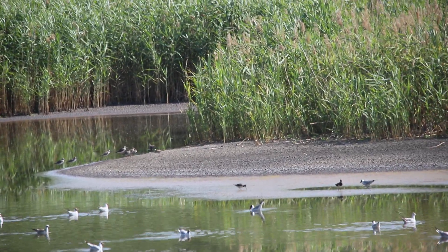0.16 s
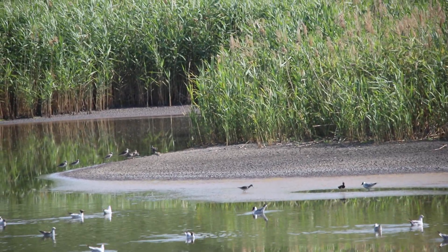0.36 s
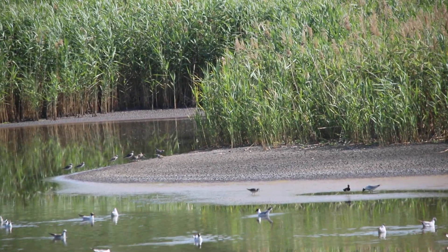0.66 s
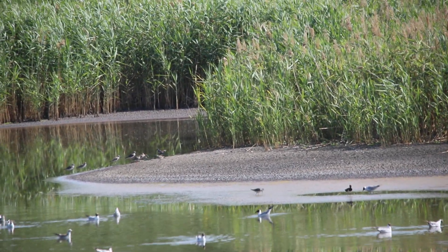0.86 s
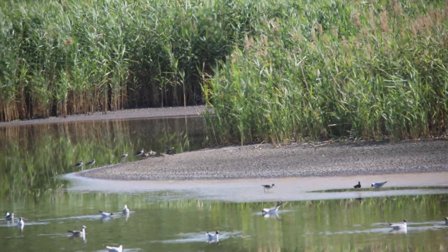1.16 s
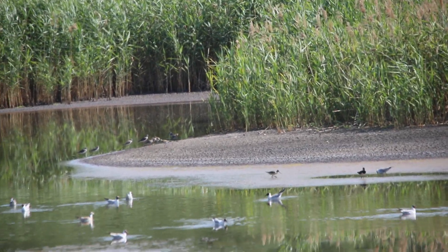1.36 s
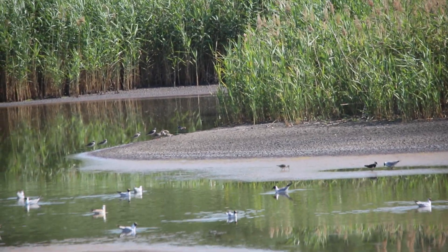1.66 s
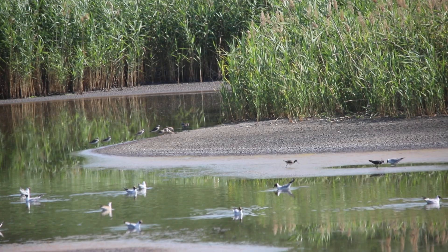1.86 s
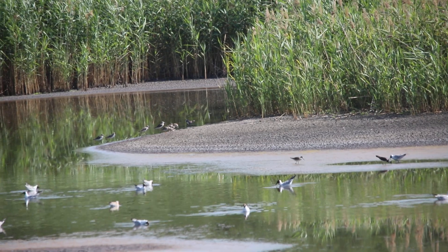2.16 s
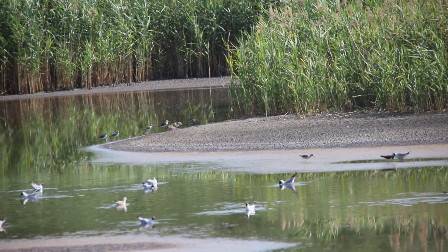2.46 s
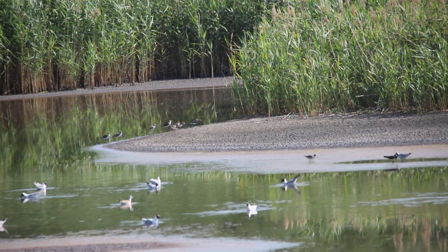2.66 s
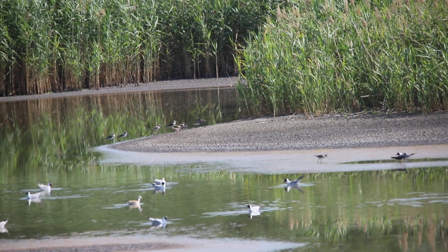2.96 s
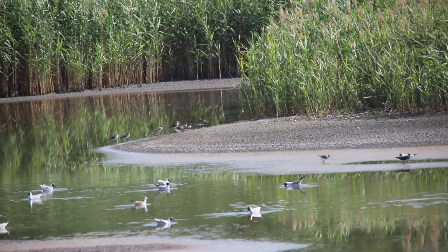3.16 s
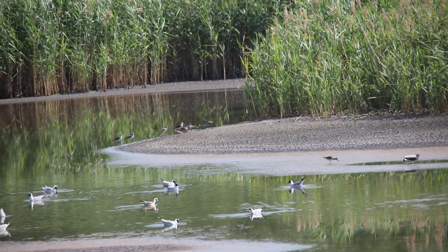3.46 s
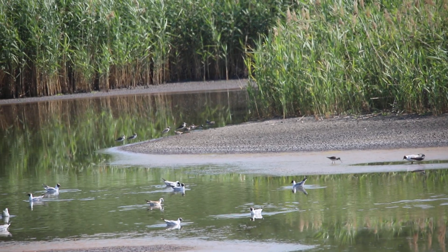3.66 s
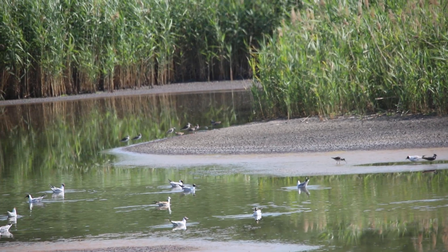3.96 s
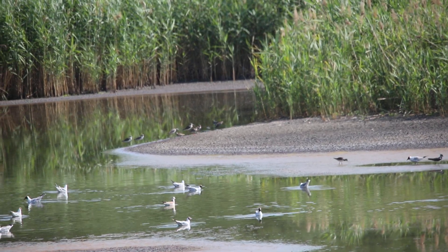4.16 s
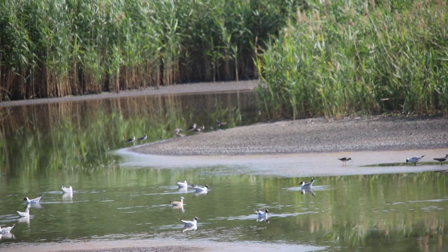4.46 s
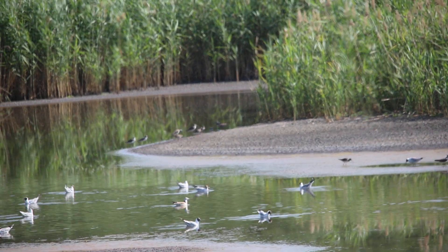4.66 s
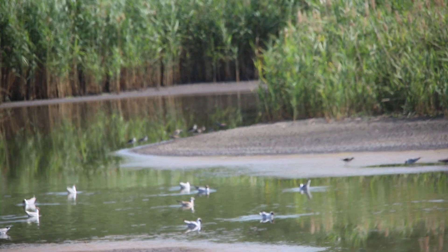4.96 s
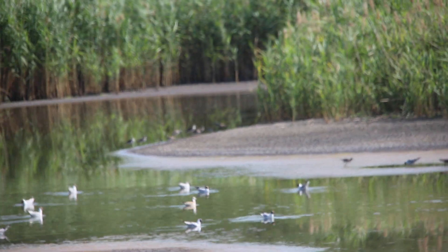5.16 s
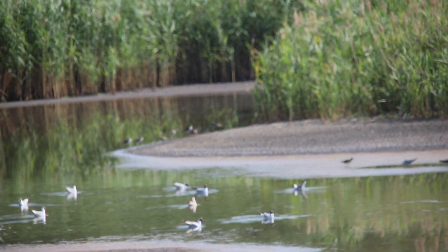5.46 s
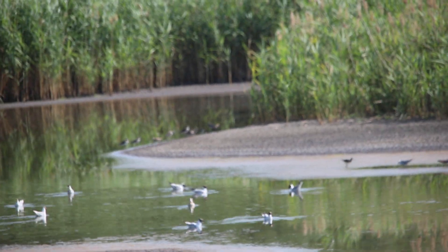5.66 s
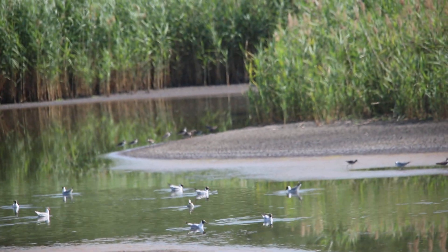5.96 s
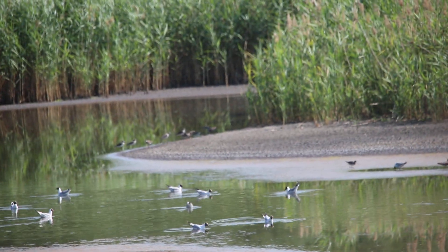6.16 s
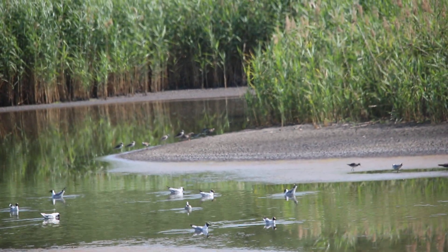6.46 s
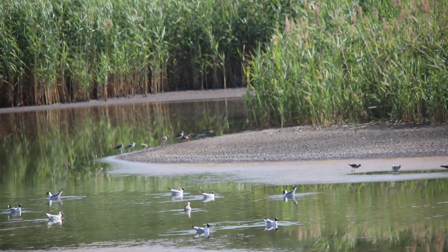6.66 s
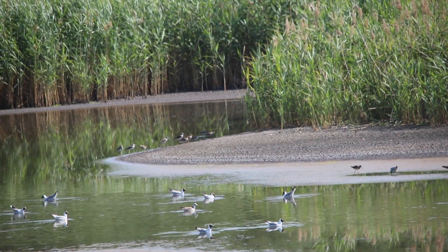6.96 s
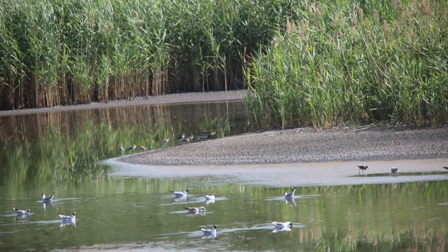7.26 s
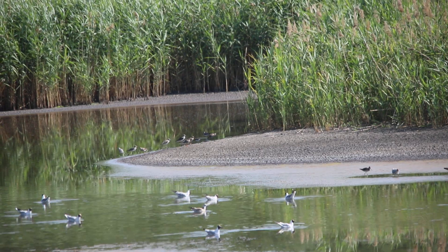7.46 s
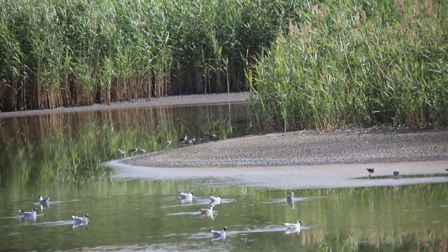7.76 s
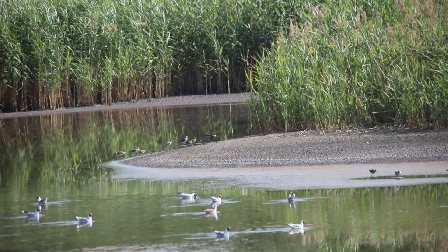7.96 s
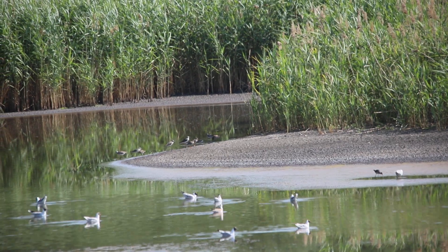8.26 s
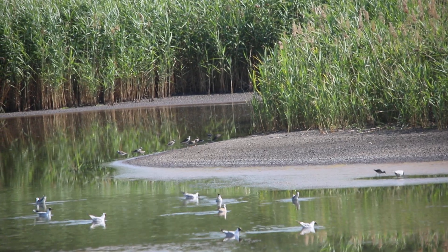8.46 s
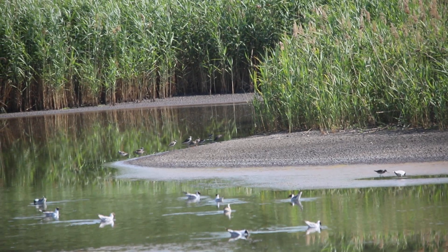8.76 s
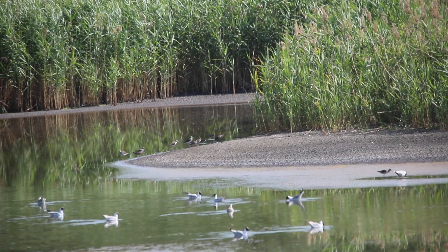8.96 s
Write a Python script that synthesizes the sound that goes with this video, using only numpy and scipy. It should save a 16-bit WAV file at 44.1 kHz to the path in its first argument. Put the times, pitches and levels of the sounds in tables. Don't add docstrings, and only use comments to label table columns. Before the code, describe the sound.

Stereo pond ambience with soft reed and water hiss. Irregular low gusts buffet the microphone, heavier on the right. Thin arched pips repeat evenly from the right, echoing slightly off the reeds, later becoming sparse. Faint chips, slurred whistles and far chatter surround them. Small plastic snaps sound close by around the middle. Late on, a burry, whistling warbler phrase rises from the left over the continuing breeze.

```python
import sys
import numpy as np
from scipy import signal
from scipy.io import wavfile
from scipy.ndimage import uniform_filter1d

SR = 44100
rng = np.random.default_rng(int(sys.argv[2]) if len(sys.argv) > 2 else 0)


def boost(x):
    u = np.asarray(x, float) / 20
    return 10 ** u


def to_wav(sig):
    pcm = np.clip(np.atleast_2d(sig), -1, 1) * 32767
    pcm = np.round(pcm).astype(np.int16)
    wavfile.write(sys.argv[1], SR, pcm.T)


N = 402191
STEP = 10


def evened(x):
    return x / np.sqrt(np.mean(x ** 2) + 1e-20)


def read(points, hz):
    f, value = np.transpose(points)
    return np.interp(np.log(hz + 1), np.log(f + 1), value)


def add(mix, s, sound, pan_db=0, lag=0):
    for port, at, db in ((0, s + lag, pan_db / 2), (1, s, -pan_db / 2)):
        first = max(round(at * SR), 0)
        part = mix[port, first:][:len(sound)]
        part += boost(db) * sound[:len(part)]


def whistle(hz, waver, warble=0):
    tremble = evened(uniform_filter1d(rng.standard_normal(len(hz)), size=90))
    swing = np.sin(2 * np.pi * np.cumsum(100 * (1 + 0.315 * tremble)) / SR)
    path = hz * (1 + waver * tremble + warble * swing)
    return np.sqrt(2) * np.sin(2 * np.pi * np.cumsum(path) / SR)


def reeds(x, t60, start, wet_db):
    t = np.arange(SR // 3) / SR
    taps = rng.choice([-1., 1.], (2, len(t))) * (rng.random((2, len(t))) < .04)
    taps *= boost(-60 * t / t60) * np.clip(t / start, 0, 1) ** 2
    taps /= np.linalg.norm(taps, axis=1, keepdims=True)
    scatter = signal.oaconvolve(x, taps, axes=1)[:, :N]
    return x + boost(wet_db) * scatter


def wader():
    # loudest_s, pitch_hz, level_db, left_right_db, broken (1 if the voice breaks)
    pips = [(0.735, 2910, -50.5, -10.5, 0), (1.168, 2910, -49.5, -4, 0), (1.536, 2830, -50.5, -5, 0),
            (1.895, 2870, -50, -2, 0), (2.249, 2850, -47, -2.1, 1), (2.613, 2820, -47.5, -3, 0),
            (2.947, 2880, -47, -5.5, 1), (3.281, 2850, -45.5, -5.5, 1), (5.116, 2774, -42, -9, 0),
            (6.725, 2740, -44, 0, 0), (7.343, 2840, -50, -7, 1), (7.989, 2800.0, -45, -7, 0)]
    # from_loudest_s, pitch_factor, level_db
    pip_shape = [(-.032, .86, -20), (-.026, .97, -9), (-.016, 1.055, -9), (-.008, 1.055, -11),
                 (-.001, 1.015, 1.5), (.008, .95, -4), (.014, .91, -12), (.022, .87, -19)]
    out = np.zeros((2, N))
    s0, factor, shape_db = np.transpose(pip_shape)
    t = np.arange(s0[0], s0[-1], 1 / SR)
    low = t < -.016
    gap = np.clip(abs(t + .015) / .003, 0, 1) * np.where(low, 2.3, 1)
    for s, hz, db, pan_db, broken in pips:
        path = hz * np.interp(t, s0, factor)
        if broken:
            path = path * np.where(low, .72, 1)
        pip = boost(db + 3.5 + np.interp(t, s0, shape_db)) * whistle(path, .008)
        if broken:
            pip = pip * gap
        add(out, s + s0[0], pip, pan_db, lag=0.00023)
    return reeds(out, t60=.33, start=0.019, wet_db=[[-4], [-9]])


def warbler():
    # start_s, length_s, start_hz, end_hz, level_db
    clear = [
        (7.912, .056, 4930, 4990, -50),
        (7.938, .024, 4900, 3950, -48.5),
        (7.958, .04, 3950, 3950, -54),
        (8.03, .04, 3800, 3680, -48),
        (8.095, .027, 3650, 3280, -43),
        (8.198, .028, 4400, 3750, -45),
        (8.268, .042, 3600, 2750, -48.5),
        (8.31, .094, 2850, 3430, -47),
        (8.708, .032, 5300, 4640, -51),
    ]
    # start_s, length_s, start_hz, end_hz, level_db
    burry = [(7.751, .11, 3130, 3270, -60.7), (7.874, .028, 3250, 4640, -55),
             (8.058, .056, 3780, 3520, -43), (8.18, .016, 5300, 4600, -53), (8.435, .036, 4750, 5400, -51),
             (8.468, .06, 5650, 5700, -56), (8.515, .03, 3700, 2600, -59), (8.545, .055, 2600, 2200, -59),
             (8.628, .022, 2700, 2900, -57), (8.645, .018, 3400, 4150, -50), (8.713, .048, 5850, 5950, -59),
             (8.8, .07, 4400, 4000, -60), (8.81, .06, 3600, 3500, -63), (8.865, .075, 3950, 3400, -59)]
    out = np.zeros((2, N))
    notes = [(*row, .78, 0.013) for row in clear]
    notes += [(*row, .47, 0.057 - .004 * (row[-1] + 45)) for row in burry]
    for s, length, start_hz, end_hz, db, halfway, warble in notes:
        u = np.linspace(0, 1, round(length * SR))
        glide = u + (4 * halfway - 2) * u * (1 - u)
        hz = start_hz + (end_hz - start_hz) * glide
        note = whistle(hz, 0.0059, warble * np.sqrt(u)) * signal.windows.tukey(len(u), .3)
        add(out, s, boost(db - 1.5) * note, 5.5, lag=-0.0002)
    return reeds(out, t60=0.28, start=.012, wet_db=1.5)


def short_notes(out):
    # start_s, length_s, start_hz, level_db
    twitter = [
        (.681, 0.049, 6450, -54.5),
        (.769, .041, 6450, -54),
        (1.605, 0.031, 6300, -58),
        (1.705, 0.05, 6930, -59.5),
        (2.715, .034, 7100, -62.5),
        (5.535, .025, 6200, -60),
    ]
    # start_s, length_s, start_hz, end_hz, level_db
    tsips = [(.735, .035, 3550, 2850, -61), (.833, 0.03, 4250, 3200, -57.5),
             (.94, 0.021, 4120, 3500, -57.5), (1.245, .019, 4330, 3520, -58),
             (3.073, .081, 5700, 4600, -62), (3.131, 0.013, 4500, 4250, -50),
             (3.16, .013, 4550, 4220, -47.5), (3.356, 0.019, 3170, 2800, -53),
             (3.519, .062, 4800, 3960, -61), (3.628, 0.018, 5950, 4960, -56),
             (3.912, .04, 4300, 4100, -53.5), (4.024, .1, 7400, 5800, -62), (4.11, .03, 6300, 5400, -62),
             (4.2, .02, 3500, 4300, -62), (4.335, .025, 4900, 4400, -62), (.697, .012, 4590, 4350, -57),
             (.718, .016, 5000, 4600, -56), (.775, .03, 6200, 5000, -56), (1.04, .014, 3900, 3500, -59),
             (1.065, .04, 5000, 4200, -61), (4.77, .03, 5700, 4060, -52), (4.86, 0.024, 5500, 4290, -53.5),
             (5.02, 0.013, 5500, 5440, -53.5), (5.028, .018, 5200, 3900, -64),
             (5.622, .017, 4980, 4960, -57), (8.27, .017, 5370, 5200, -58)]
    # start_s, length_s, start_hz, end_hz, level_db
    pipes = [(0, .016, 3000, 2850, -54), (.028, .065, 2800, 3200, -57), (.09, .045, 3220, 3200, -60),
             (.238, .07, 3820, 4080, -54), (.31, .09, 4000, 4000, -62), (.41, .035, 3600, 3650, -62),
             (.55, .05, 2850, 2850, -59), (.497, .041, 2950, 2700, -60.5), (.597, .05, 3300, 4280, -62),
             (1.63, .025, 3300, 3600, -61), (2.4, .042, 3200, 2350, -59), (2.572, 0.017, 2250, 2860, -55),
             (3.462, 0.051, 4400, 5070, -57.5), (3.864, .008, 3750, 3300, -55),
             (3.874, .008, 3650, 3400, -55), (4.555, .03, 2700, 2350, -63), (4.56, .026, 2900, 4030, -55),
             (4.582, 0.015, 4600, 5050, -52), (4.765, .012, 4400, 5600, -56),
             (4.877, .012, 3700, 3100, -60), (4.9, .04, 3300, 3550, -64), (4.945, .03, 4300, 4500, -62),
             (6.335, .05, 3750, 3030, -66), (6.385, 0.037, 3000, 2770, -61), (6.5, .025, 2400, 2610, -62),
             (6.539, .02, 2750, 3000, -61), (5.171, .03, 4000, 3520, -60)]
    # start_s, length_s, pitch_hz, level_db
    far = [
        (.165, .07, 2320, -58),
        (4.38, .14, 2950, -62),
        (4.696, .06, 2950, -62),
        (4.78, .05, 2950, -63),
        (5.008, 0.063, 2940, -56.5),
        (4.11, .08, 2760, -64),
        (6.28, 0.12, 8700, -70),
        (8.24, .13, 8550, -69),
    ]
    notes = [(s, length, hz, hz * .84, db, -1) for s, length, hz, db in twitter]
    notes += [(*row, 12) for row in tsips]
    notes += [(*row, 11) for row in pipes]
    notes += [(s, length, hz, hz, db, 4.5) for s, length, hz, db in far]
    for s, length, start_hz, end_hz, db, pan_db in notes:
        hz = np.geomspace(start_hz, end_hz, round(length * SR))
        warble = np.interp(start_hz, [3900, 4600, 5600, 5800], [.006, .045, .07, .095])
        note = whistle(hz, 0.018, warble) * signal.windows.tukey(len(hz), .4)
        add(out, s, boost(db - 3.0) * note, pan_db)


def bent_notes(out):
    # start_s, length_s, foot_hz, top_hz, level_db
    arches = [
        (2.01, 0.065, 2710, 3130, -63.5),
        (2.52, .075, 2750, 3210, -62),
        (2.702, .082, 2530, 3180, -59.5),
    ]
    # time_s, pitch_hz, level_db
    slur = [(4.42, 4530, -65), (4.427, 4790, -47), (4.44, 5210, -50), (4.449, 4470, -48),
            (4.462, 4220, -56), (4.48, 3400, -57), (4.491, 2870, -55), (4.504, 3530, -50),
            (4.514, 2700, -60)]
    # time_s, pitch_hz, level_db
    zigzag = [(4.064, 3800, -64), (4.072, 5200, -52), (4.081, 6800, -57), (4.086, 4600, -49),
              (4.091, 5600, -52), (4.097, 4300, -50), (4.104, 3700, -64)]
    for s, length, foot_hz, top_hz, db in arches:
        arch = np.sin(np.linspace(0, np.pi, round(length * SR))) ** .6
        note = whistle(foot_hz + (top_hz - foot_hz) * arch, 0.0074) * arch ** 0.34
        add(out, s, boost(db) * note, 4)
    for path in (slur, zigzag):
        s, hz, db = np.transpose(path)
        t = np.arange(s[0], s[-1], 1 / SR)
        note = whistle(np.interp(t, s, hz), 0.0051)
        add(out, s[0], boost(np.interp(t, s, db)) * note, 8)


def chips():
    out = np.zeros((2, N))
    short_notes(out)
    bent_notes(out)
    return reeds(out, t60=0.23, start=0.0058, wet_db=-4.0)


def chatter():
    # time_s, level_db
    flock = [(0, -68), (1.2, -65.5), (2.3, -74), (5.6, -71), (6.2, -78), (9.12, -73)]
    out = np.zeros((2, N))
    for at, pitch, glide, size in rng.random((320, 4)):
        s = at * N / SR
        bend = np.linspace(0, .5, round(SR * (0.013 + .02 * size)))
        hz = 2300 * 2 ** (1.3 * pitch + (glide - .6) * bend)
        db = np.interp(s, *np.transpose(flock)) + 4 * size
        add(out, s, boost(db) * whistle(hz, 0.027, 0.09) * np.hanning(len(hz)), 7)
    return reeds(out, t60=0.17, start=0.0088, wet_db=4.1)


def ticks():
    # start_s, ring_hz, t60_s, level_db, left_right_db
    rings = [(3.9425, 7500, 0.011, -45, -7), (3.945, 5700, 0.017, -42, -9), (3.944, 1470, 0.0069, -35, 7),
             (3.9435, 10500, 0.0085, -46.5, -2), (5.2975, 570, 0.011, -29, 1.5), (5.298, 760, .011, -33, 3),
             (5.2985, 1080, 0.012, -38, 10), (5.433, 560, 0.022, -35, 4), (5.436, 800, 0.023, -35.5, -9),
             (5.436, 1900, 0.015, -40, 9), (5.4425, 2430, 0.018, -34, -5), (5.442, 1220, 0.02, -36, 11),
             (5.444, 560, .018, -33, -1), (5.446, 5400, 0.013, -46, 8), (5.4455, 2180, 0.017, -35.5, 8)]
    out = np.zeros((2, N))
    t = np.arange(1500) / SR
    for s, hz, t60, db, pan_db in rings:
        b, a = signal.butter(2, hz / 2, fs=SR)
        grit = evened(signal.lfilter(b, a, rng.standard_normal(len(t))))
        ring = np.sin(2 * np.pi * hz * t) * (1 + 0.39 * grit)
        attack = np.minimum(t * hz / 0.73, 1)
        add(out, s, boost(db - 60 * t / t60) * attack * ring, pan_db)
    return reeds(out, t60=.03, start=.002, wet_db=-6)


def gusts(t, breeze_db, rows):
    rise_db_per_s, fall_db_per_s = 123, 128
    power = boost(2 * breeze_db)
    for s, hold, db in rows:
        off_db = rise_db_per_s * np.maximum(s - t, 0) + fall_db_per_s * np.maximum(t - s - hold, 0)
        power = power + boost(2 * (db - off_db))
    return 10 * np.log10(power)


def swirl(hz, turns, start):
    reach = 2 * SR / STEP / hz
    u = np.arange(-reach, reach) * STEP * hz / SR
    return np.exp(-(u / turns) ** 2) * np.cos(2 * np.pi * (u + start))


def wind():
    # time_s, left_db, right_db
    breeze = [(0, -53, -62), (.4, -51, -52), (1.1, -50, -50), (1.8, -60, -57.5), (2.4, -55, -56.5),
              (2.8, -54, -59), (3.3, -56, -44), (4.3, -52, -53), (5.0, -50.5, -49), (5.6, -53, -55.5),
              (6.0, -62, -59.5), (6.6, -58, -58.5), (7.1, -51, -46.5), (7.8, -59, -47.5), (8.5, -55, -45),
              (9.12, -56, -44)]
    # peak_start_s, hold_s, level_db
    gusts_left = [(.1, 0, -46), (.3, 0.13, -42.5), (.6, 0.0077, -35), (.7, 0.082, -43), (1.7, 0, -45),
                  (1.997, .03, -45.5), (2.653, 0.073, -50.5), (3.2, 0.065, -47), (3.6, 0.041, -46),
                  (4.1, 0.03, -51), (4.4, 0, -47.5), (4.6, 0, -47), (4.8, 0, -40.5), (4.9, .15, -47.5),
                  (6.9, 0, -53), (7.5, 0, -47), (8.006, 0.14, -48), (8.6, 0.077, -46)]
    # peak_start_s, hold_s, level_db
    gusts_right = [(0.398, 0.019, -40), (0.601, .2, -29), (1.0, 0, -35.5), (1.195, 0.077, -39.5),
                   (1.7, 0, -39.5), (2.0, 0.15, -50), (3.0, 0.029, -42), (3.272, 0.21, -33), (3.6, 0, -30),
                   (3.8, 0, -37), (4.043, 0.081, -38), (4.578, 0.018, -34.5), (4.8, 0, -38.5),
                   (5.1, 0.088, -42.5), (5.5, 0.016, -44.5), (6.703, 0.047, -51), (6.92, .12, -44),
                   (7.15, .2, -40), (7.4, .12, -43), (8.0, 0, -44.5), (8.2, 0.016, -39.5),
                   (8.723, 0.092, -39), (9.095, 0.0012, -39)]
    # time_s, peak_db, pitch_hz
    eddies_left = [
        (.311, -30.5, 109),
        (.383, -26.5, 110),
        (.597, -32, 71),
        (0.643, -19.5, 129),
        (.681, -32, 82),
        (0.714, -23, 110),
        (4.783, -30, 127),
        (4.824, -30.5, 146),
    ]
    # time_s, peak_db, pitch_hz
    eddies_right = [(.525, -29.5, 173), (.607, -20.3, 203), (.636, -27, 129), (.71, -19, 148),
                    (.746, -23, 267), (.797, -21, 178), (.83, -29.5, 202), (.966, -29, 194),
                    (1.183, -28.5, 141), (3.202, -29, 129), (3.26, -22, 151), (3.267, -28, 330),
                    (3.316, -21.5, 111), (3.376, -31, 150), (3.402, -24.5, 273), (3.43, -26, 129),
                    (3.467, -27, 111), (3.579, -24.5, 206), (3.613, -25, 203), (3.78, -30, 100),
                    (3.815, -29.5, 110), (4.05, -22, 100), (4.075, -28, 100), (4.093, -28, 80),
                    (4.12, -29, 130), (4.05, -29, 340), (4.056, -19, 194), (4.537, -27.5, 151),
                    (4.575, -29, 130), (4.622, -27, 70), (4.628, -26.5, 126), (4.758, -27.5, 107),
                    (6.922, -33, 100), (6.95, -35, 110), (7.04, -30, 120), (7.148, -29.5, 80),
                    (7.19, -29, 140), (7.222, -33, 111), (7.255, -32, 120), (7.278, -26, 148),
                    (7.3, -32, 120), (7.375, -31, 130), (7.5, -33, 90), (7.52, -33, 70), (8.665, -34, 110),
                    (8.825, -30, 150), (8.855, -32, 150)]
    s, *ports_db = np.transpose(breeze)
    t = np.arange(N // STEP + 1) * STEP / SR
    out = np.zeros((2, len(t)))
    for port, (points_db, rows) in enumerate(zip(ports_db, (gusts_left, gusts_right))):
        level_db = gusts(t, np.interp(t, s, points_db), rows)
        centre_hz = 62 * 2 ** ((level_db + 48.5) / 24)
        for hz in (36, 52, 75, 105, 150, 210, 300):
            draw, sign, size = rng.random((3, len(t)))
            starts = draw < .45 * hz * STEP / SR
            train = boost(5.6 * size) * np.sign(sign - .5) * starts
            octaves = np.log2(hz / centre_hz)
            share = np.exp(-(octaves / np.where(octaves < 0, 2.2, 1.15)) ** 2)
            swirls = evened(signal.oaconvolve(train, swirl(hz, 0.5, .2), "same"))
            out[port] += swirls * share * boost(level_db - 6.0)
    eddies = [(0, *row) for row in eddies_left] + [(1, *row) for row in eddies_right]
    for port, s, db, hz in eddies:
        eddy = boost(db + 2.0) * swirl(hz, 0.62, rng.random())
        at = round(s * SR / STEP) - len(eddy) // 2
        out[port, at:at + len(eddy)] += eddy
    b, a = signal.butter(1, 60, fs=SR / STEP)
    out[0] += signal.lfilter(b, a, 0.18 * out[1])
    return signal.resample_poly(out, STEP, 1, axis=1)[:, :N]


def hiss():
    # pitch_hz, level_db (per Hz)
    colour = [(24, -45), (40, 0), (91, -25), (123, 1), (139, -2), (230, -3), (536, -3), (593, -4.5),
              (1050, -5.5), (1350, -6), (2120, -6), (5070, -10.5), (15600, -28.5)]
    # time_s, level_db
    swell = [(0.0, -58), (5.51, -59), (9.12, -59.5)]
    # pitch_hz, likeness (-1 to 1)
    likeness = [(60, 0.33), (150, 0.26), (380, 0.2), (950, 0.31), (2380, -0.22), (5980, 0.071),
                (15000, 0.051)]
    # pitch_hz, left_right_db
    tilt = [(60, 0.5), (180, 4.8), (550, 2.9), (1650, 2.9), (4970, 3.7), (15000, 0.34)]
    frames, hz = N // 256 + 5, np.fft.rfftfreq(1024, 1 / SR)
    a, b, c, d, patches = rng.standard_normal((frames, 513, 5)).T
    patches = uniform_filter1d(patches, size=14, axis=0)
    patches = evened(uniform_filter1d(patches, size=16, axis=1))
    s, swell_db = np.transpose(swell)
    swell_db = np.interp(np.arange(frames) * 256 / SR, s, swell_db + 61.5)
    reach = 1 / (1 + (hz[:, None] / 4500) ** 2)
    same = np.clip(read(likeness, hz), -1, 1)[:, None]
    left = a + 1j * b
    right = same * left + np.sqrt(1 - same ** 2) * (c + 1j * d)
    z = np.array([left, right])
    z *= boost(read(colour, hz)[:, None] + 0.5 * patches + reach * swell_db)
    z *= boost(np.outer([.5, -.5], read(tilt, hz)))[:, :, None]
    sound = signal.istft(z, nperseg=1024, noverlap=768)[1][:, :N]
    return boost(-51.5) * evened(sound)


def scene():
    return wader() + warbler() + chips() + chatter() + ticks() + wind() + hiss()


def roll_off(x):
    return signal.sosfilt(signal.butter(12, 15750, fs=SR, output="sos"), x)


def record(dry):
    bass_cut = signal.butter(2, 35, "high", fs=SR, output="sos")
    mix = signal.sosfilt(bass_cut, dry)
    return roll_off(mix)


dry = scene()
out = record(dry)
to_wav(out)
```